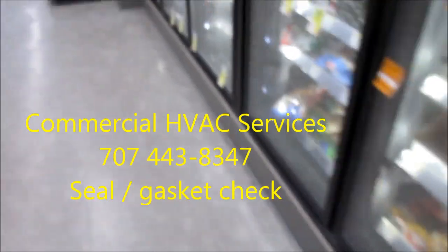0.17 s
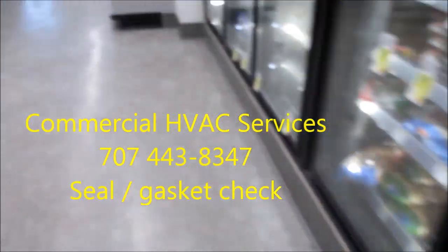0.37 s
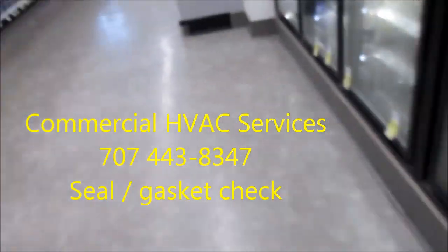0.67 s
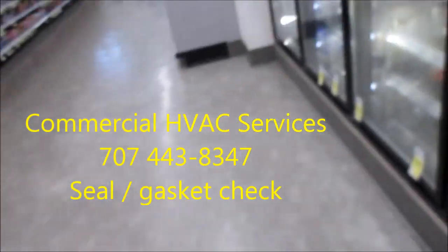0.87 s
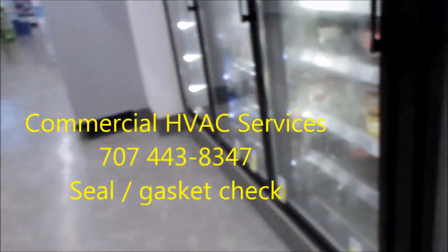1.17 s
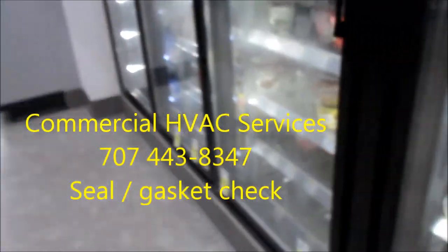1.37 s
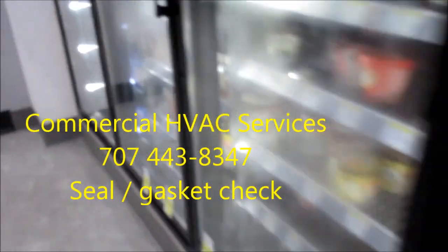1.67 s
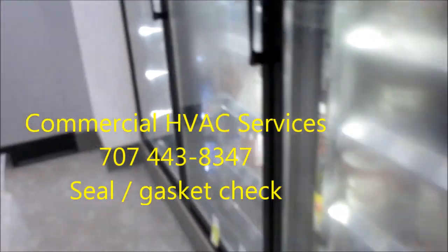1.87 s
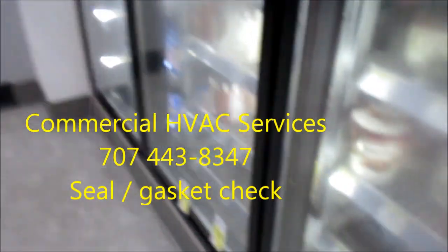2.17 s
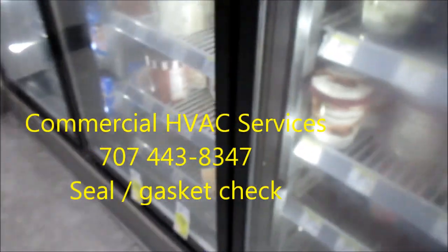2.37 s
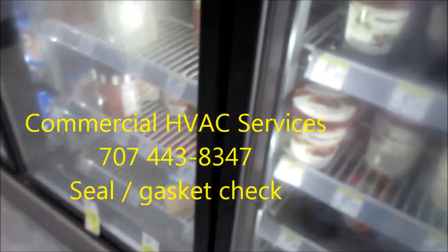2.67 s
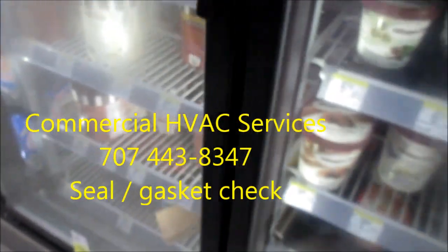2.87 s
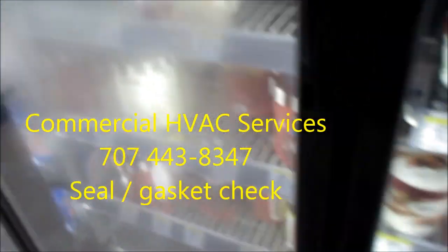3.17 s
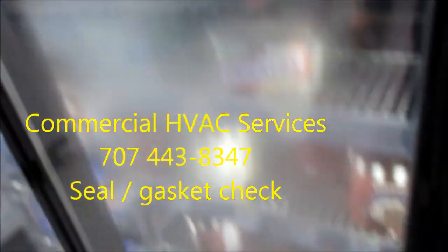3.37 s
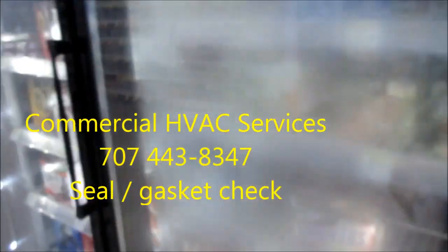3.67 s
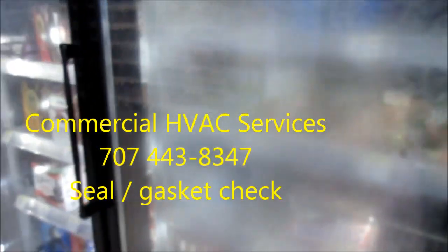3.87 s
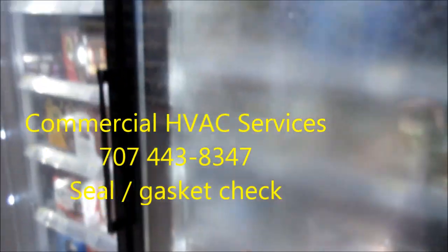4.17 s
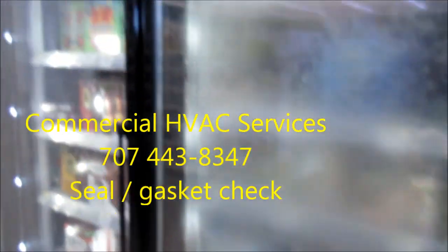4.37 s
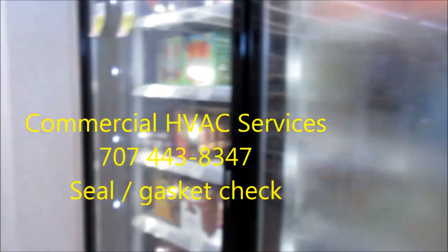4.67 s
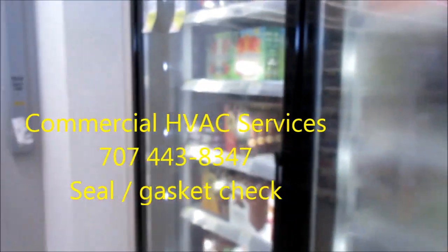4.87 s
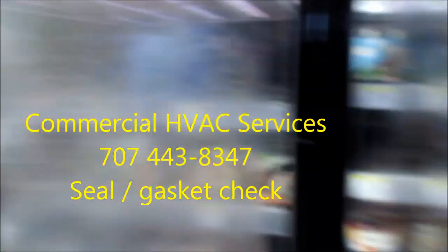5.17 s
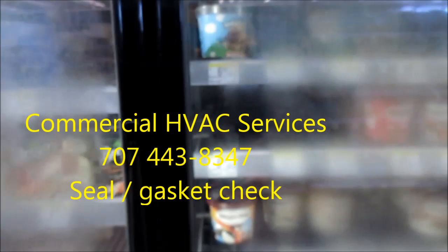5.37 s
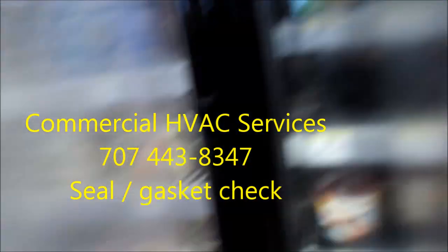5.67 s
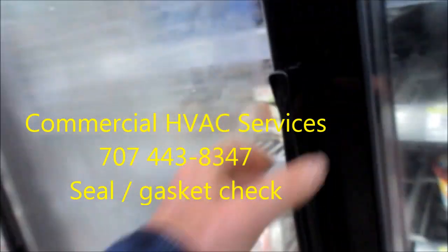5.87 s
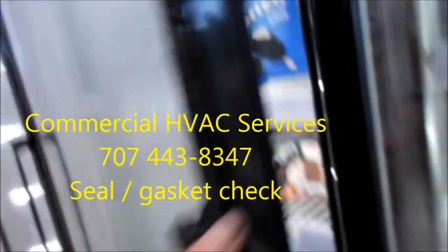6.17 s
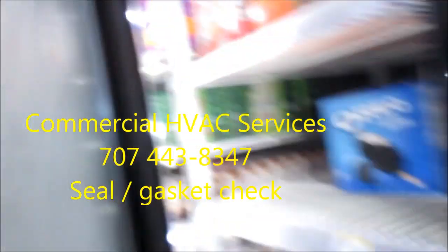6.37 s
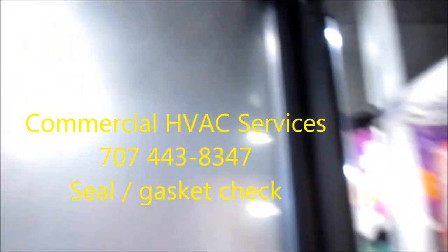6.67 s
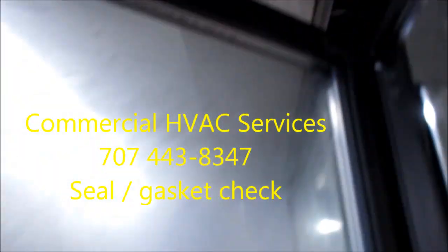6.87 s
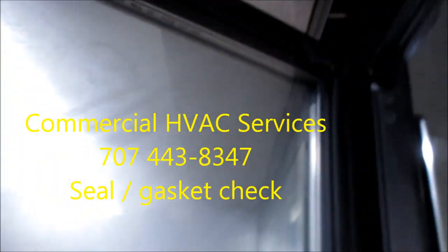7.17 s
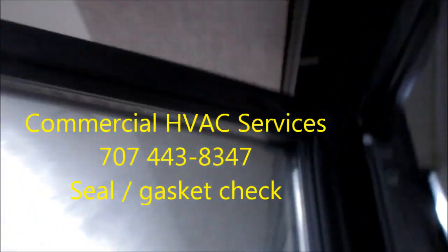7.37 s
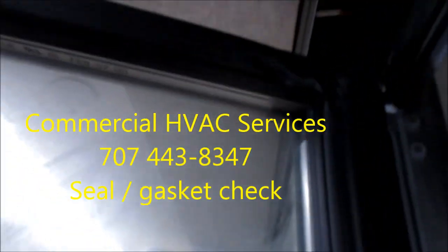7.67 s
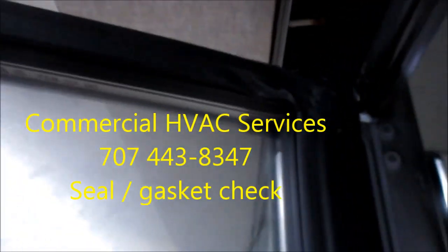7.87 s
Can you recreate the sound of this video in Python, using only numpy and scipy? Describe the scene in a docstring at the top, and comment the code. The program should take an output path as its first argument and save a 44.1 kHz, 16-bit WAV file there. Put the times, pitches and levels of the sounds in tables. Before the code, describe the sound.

Refrigerated cases drone under shoe scuffs, rustling clothes and plastic creaks, until a door unseals and louder fans throb with gusting air.

```python
"""Along the shop freezers

Compressors and fans hum behind glass doors while a walker's shoes and sleeves scuff, small hard things
tick and the plastic case of a hand-held camera creaks in the grip. Then a door peels off its gasket and
swings open: cold air rushes out and three fans of nearly equal speed throb against each other."""
import sys
import numpy as np
from scipy.fft import rfft, irfft, next_fast_len
from scipy.io import wavfile
from scipy.ndimage import map_coordinates

SR = 44100
rng = np.random.default_rng(int(sys.argv[2]) if len(sys.argv) > 2 else 0)


def generate_wav(signal):
    """Clip the signal to [-1, 1] and save it as 16-bit WAV at the path in sys.argv[1]."""
    frames = np.transpose(np.atleast_2d(signal))
    scaled = np.clip(frames, -1, 1) * 32767
    pcm = np.round(scaled).astype(np.int16)
    wavfile.write(sys.argv[1], SR, pcm)


N = 354123
TIME = np.arange(N) / SR
DOOR_AT_S, SWING_S = 5.942, 0.4


def amp(db):
    """Decibels to gain."""
    return 10 ** (np.asarray(db) / 20)


def unit(x):
    """Scale to rms 1."""
    return x / np.sqrt(np.mean(x ** 2) + 1e-20)


def ramp(start_s, length_s):
    """A smooth fade from 0 to 1."""
    return np.sin(np.pi / 2 * np.clip((TIME - start_s) / length_s, 0, 1)) ** 2


def swell(peak_s, half_width_s):
    """A smooth bump of height 1."""
    return np.exp(-((TIME - peak_s) / half_width_s) ** 2)


def stroke(t, rise_s, fall_s):
    """Exponential attack up to t = 0, then release."""
    return np.exp(np.minimum(t / rise_s, -t / fall_s))


def wobble(rate):
    """A smooth random curve, rate knots a second."""
    return map_coordinates(rng.standard_normal(int(N * rate / SR) + 4), [TIME * rate])


def filtered(x, response):
    """Pass x through a complex frequency response."""
    size = next_fast_len(len(x) + 8192)
    return irfft(rfft(x, size) * response(np.fft.rfftfreq(size, 1 / SR)), size)[:len(x)]


def colour(points, hz):
    """An EQ curve: the gain of (freq_hz, level_db) points joined on a log axis."""
    freq_hz, level_db = np.transpose(points)
    return amp(np.interp(np.log(hz + 1), np.log(freq_hz + 1), level_db))


def struck_body(points, hz):
    """The minimum-phase response of a struck body with this spectrum."""
    cepstrum = irfft(np.log(colour(points, hz)))
    half = len(cepstrum) // 2
    return np.exp(rfft(np.r_[cepstrum[0], 2 * cepstrum[1:half], np.zeros(half)]))


def resonances(modes, hz):
    """The response of (pitch_hz, width_hz, level_db) modes of alternating polarity."""
    return sum((-1) ** k * amp(db) * 1j * hz * width / (pitch ** 2 - hz ** 2 + 1j * hz * width)
               for k, (pitch, width, db) in enumerate(modes))


def noise(response, size=N):
    """Smooth filtered noise of rms 1."""
    return unit(filtered(rng.standard_normal(size), response))


def rush(spectrum):
    """Turbulent noise of rms 1, shaped by an EQ curve."""
    return noise(lambda hz: colour(spectrum, hz))


def ringing(modes):
    """Noise of rms 1 in a set of resonances."""
    return noise(lambda hz: resonances(modes, hz))


def friction(response, rate, size=N):
    """Tiny slips of random strength, rate a second, filtered and scaled to rms 1."""
    slips = rng.standard_normal(size) * (rng.random(size) < rate / SR)
    return unit(filtered(slips, response))


def motor_tones(lines, drift_hz, waver_db, rate):
    """Tones that each wander a little in speed and strength."""
    out = np.zeros(N)
    for pitch_hz, level_db in lines:
        turns = np.cumsum(pitch_hz + drift_hz * wobble(rate)) / SR + rng.random()
        out += np.sqrt(2) * amp(level_db + waver_db * wobble(rate)) * np.sin(2 * np.pi * turns)
    return out


# Fader ride on the aisle's air noise: time_s, level_db
AISLE_RIDE = [(0.24, -30.5), (1.35, -29), (1.8, -34), (2.3, -29.5), (3.1, -30), (5.95, -32.5)]
# Rumbling colour of that air: freq_hz, gain_db
AISLE_EQ = [(11, -34), (22, -19), (45, -2), (85, -8), (110, -1.5), (140, -6), (185, -9.5), (240, -8),
            (390, -10), (450, -14.5), (650, -19.5), (950, -22.5), (1560, -25), (1800, -32.5), (3000, -37),
            (4000, -43.5), (10000, -51.5), (16000, -58)]
# Cabinet panels shaken by the machines: pitch_hz, width_hz, gain_db
PANEL_MODES = [(251.4, 13.5, 1.5), (296, 9.1, 2.5), (374.4, 19.3, -5.5), (720, 74, -15.5),
               (1170, 130, -19.5), (1590, 44, -19)]
# Far compressors and fans: pitch_hz, level_db
FAR_HUM = [(26.6, -55), (29.9, -38), (58.8, -37.5), (70.7, -40), (119.9, -51), (133.2, -42.5)]
# One cabinet's blade tone and its octave: pitch_hz, gain_db
BLADE_TONES = [(126.8, -0.5), (254.5, -12.5)]
# Dips where the walk crosses nodes of that fan's standing wave: centre_s, half_width_s
FAN_NODES = [(.66, 0.16), (1.16, 0.031), (2.7, 0.35), (4.48, 0.17)]


def aisle():
    """Machines behind shut doors: air noise, droning panels and motor tones; a thin high whine sounds
    throughout."""
    near = ramp(start_s=1.5, length_s=1.78)  # the walker closes in on one cabinet
    in_node = sum(swell(centre_s, half_width_s) for centre_s, half_width_s in FAN_NODES)
    air = amp(np.interp(TIME, *np.transpose(AISLE_RIDE))) * rush(AISLE_EQ)
    panels = amp(-42 + 10 * near) * ringing(PANEL_MODES)
    hum = motor_tones(FAR_HUM, drift_hz=0.34, waver_db=2.5, rate=2.66)
    blades = motor_tones(BLADE_TONES, drift_hz=0.2, waver_db=0.8, rate=2)
    fan = amp(-33 + 2.5 * near - 11 * in_node) * blades
    whine = motor_tones([(15734, -76)], drift_hz=1, waver_db=3, rate=2)
    screened = amp(-10 * ramp(DOOR_AT_S, SWING_S))  # the open door screens off the aisle
    return screened * (air + panels + hum + fan) + whine


# Swishes of sleeves and trousers: peak_s, level_db, half_width_s
CLOTH_MOVES = [(.42, -51, 0.18), (.95, -51, 0.17), (1.8, -52, 0.17), (2.17, -53.5, .12), (2.6, -52, 0.086),
               (3.67, -52, .08), (4.55, -55, 0.18), (4.92, -50.5, 0.23), (5.22, -55, 0.089)]
# Papery colour of the fabric: freq_hz, gain_db
CLOTH_EQ = [(400, -25), (1500, 7.5), (3000, 3), (6000, -1.5), (10000, -7), (13000, -11), (16000, -19)]


def clothes():
    """Rubbing fabric swishes with every move, over a faint fluttering rustle."""
    rustle_db, flutter_db = -61, 1.5
    moves = sum(amp(db) * swell(peak_s, half_width_s) for peak_s, db, half_width_s in CLOTH_MOVES)
    return np.hypot(amp(rustle_db), moves) * amp(flutter_db * wobble(14)) * rush(CLOTH_EQ)


# Shoe and sleeve scuffs: peak_s, level_db, length_s, tilt_db_per_octave, rasp_hz
SCUFF_CUES = [(0.313, -41, 0.088, 1, 3000), (.592, -33.5, 0.068, -1.5, 6300),
              (0.728, -33.5, .032, 3.5, 2200), (0.929, -33, 0.026, -3, 6200), (1.199, -30, 0.021, -2, 1300),
              (1.317, -36, 0.028, 3, 9200), (1.862, -36.5, 0.17, -6, 4120), (1.974, -38, 0.027, 0, 6000),
              (2.031, -38, .054, 2, 5000), (2.633, -27.5, 0.039, 2, 3800), (2.687, -34.5, 0.078, 1.5, 5000),
              (2.754, -43.5, 0.073, 5, 5300), (3.043, -29.5, .022, 4.5, 1520), (3.302, -44, 0.023, 3, 6000),
              (3.405, -39.5, 0.071, 1.5, 5000), (5.138, -43, 0.077, -2, 3500),
              (5.596, -46, 0.16, 1.5, 5500), (5.78, -45, .07, -2, 6000)]
# Mid-heavy colour shared by scuffs, ticks and the gasket: freq_hz, gain_db
CONTACT_EQ = [(150, -29), (500, 11.5), (1200, 9), (2500, 2), (4500, -3), (7000, -6), (10000, -8),
              (13000, -12), (16000, -19)]


def scuffs():
    """Shoes and sleeves rub: each burst of slips swells and dies with its own tilt and raspy peak."""
    out = np.zeros(N)
    t = np.arange(SR // 2) / SR - 0.25  # zero at the peak
    rise_share = 0.35
    for peak_s, level_db, length_s, tilt_db, rasp_hz in SCUFF_CUES:
        rasp = lambda hz: 1 + resonances([(rasp_hz, 0.37 * rasp_hz, 3)], hz)
        body = lambda hz: colour(CONTACT_EQ, hz) * amp(tilt_db * np.log2(1 + hz / 1500)) * rasp(hz)
        rub = friction(body, rate=9000, size=len(t))
        envelope = stroke(t, rise_share * length_s, (1 - rise_share) * length_s)
        out[round((peak_s + t[0]) * SR):][:len(t)] += amp(level_db) * envelope * rub
    return out


# Small hard contacts: start_s, crack_db, ring_hz, ring_over_crack_db
TICK_CUES = [(.85, -33, 3900, -0.5), (1.163, -30.5, 1880, 0), (1.295, -26, 2500, -16),
             (1.34, -37, 1090, 11), (1.505, -45, 1170, 15.5), (1.713, -40.5, 1400, 3),
             (2.1965, -41.5, 720, 18.5), (2.266, -36.5, 720, 11), (2.525, -37, 6960, -1),
             (2.612, -45, 1190, 15), (2.672, -32, 1170, 14), (3.044, -41, 1400, 4),
             (3.265, -31.5, 1970, 4.5), (4.768, -43, 1090, 15), (5.59, -41, 1490, 17)]


def ticks():
    """Each hard contact gives a crack, a knock of a few cycles and one short, blurred ring."""
    out, t = np.zeros(N), np.arange(SR // 10) / SR
    knock_cycles, blur_db = 2.6, -5.5
    for start_s, crack_db, ring_hz, ring_db in TICK_CUES:
        t60_s = 0.04 * (1500 / ring_hz) ** 0.55  # higher rings die sooner
        crack = noise(lambda hz: colour(CONTACT_EQ, hz), len(t))
        blur = noise(lambda hz: resonances([(ring_hz, 0.5 * ring_hz, 0)], hz) ** 2, len(t))
        knock = 2 * np.sin(2 * np.pi * ring_hz * t) * np.exp(-ring_hz * t / knock_cycles)
        ring = amp(ring_db) * (knock + amp(blur_db) * blur)
        out[round(start_s * SR):][:len(t)] += amp(crack_db - 60 * t / t60_s) * (crack + ring)
    return out


# The camera case slips in the grip: start_s, snap_db, chatter_db, chatter_length_s
CREAK_CUES = [(1.331, -28, -25, 0.014), (1.403, 0.5, -22, 0.021), (1.473, -12, -27, 0.018),
              (1.5292, -13.5, -29.5, 0.016), (1.645, -30, -28.5, 0.029), (2.013, -16.5, -32.5, 0.014),
              (5.607, -15.5, -33.5, 0.043)]
# Hollow body of the plastic shell: freq_hz, gain_db
SHELL_EQ = [(100, -25), (300, 0.5), (600, 4), (950, -8), (1350, -2), (1900, -8.5), (2550, -5), (3050, -19),
            (3600, -21.5), (5000, -25.5), (6200, -23.5), (7400, -30.5), (9000, -29), (12800, -34),
            (16000, -43)]
# The shell's ring after a snap: pitch_hz, width_hz, gain_db
SHELL_MODES = [(1400, 380, 3), (2360, 230, -3)]


def grip_creaks():
    """The plastic lets go with a ringing snap, then chatters in brighter slips until it sticks again."""
    out, t = np.zeros(N), np.arange(SR // 10) / SR
    dull_hz, bright_hz, ring_db = 4500, 3000, -17
    treble_lift = lambda hz: 1 + 1j * hz / bright_hz
    impulse = 1.0 * (t == 0)
    thud = filtered(impulse, lambda hz: struck_body(SHELL_EQ, hz) / (1 + 1j * hz / dull_hz))
    ring = filtered(impulse, lambda hz: resonances(SHELL_MODES, hz) / treble_lift(hz))
    snap = thud / np.abs(thud).max() - amp(ring_db) * ring / np.abs(ring).max()
    for start_s, snap_db, chatter_db, length_s in CREAK_CUES:
        chatter = friction(lambda hz: struck_body(SHELL_EQ, hz) * treble_lift(hz), rate=9000, size=len(t))
        sliding = amp(-3 * t / length_s) * np.exp(-(t / length_s) ** 6)  # sags, then stops short
        out[round(start_s * SR):][:len(t)] += amp(snap_db) * snap + amp(chatter_db) * sliding * chatter
    return out


# The rubber gasket lets go in two pulls: peak_s, level_db
GASKET_PULLS = [(6.05, -27.5), (6.118, -38)]
# Low pushes of air from the moving door: centre_s, level_db
DOOR_PUFFS = [(6.133, -13), (7.915, -24)]


def door_seal():
    """The gasket crackles off the frame; the pressure evens out in low puffs."""
    pull = sum(amp(db) * stroke(TIME - peak_s, rise_s=0.0086, fall_s=0.027) for peak_s, db in GASKET_PULLS)
    out = pull * friction(lambda hz: colour(CONTACT_EQ, hz), rate=3000)
    puff_hz = 45
    for centre_s, level_db in DOOR_PUFFS:
        pressure = np.sin(2 * np.pi * puff_hz * (TIME - centre_s))
        out -= amp(level_db) * pressure * swell(centre_s, half_width_s=0.013)
    return out


# Three beating fan tones and one overtone: pitch_hz, gain_db
FREEZER_FANS = [(120.0, -1.5), (126.7, -8), (133.4, -.5), (400.2, -21)]
# Cold air spills out in gusts: peak_s, draught_db, air_lift_db
COLD_GUSTS = [(6.36, -16, -1.5), (6.68, -23, 3.5), (7.1, -36, 1.5), (7.63, -22, 0)]
# Colour of the fans' air noise: freq_hz, gain_db
FAN_AIR_EQ = [(25, -20), (70, -12.5), (105, 1), (150, 0.5), (190, -3.5), (240, 0), (500, -9.5),
              (700, -10.5), (900, -12.5), (1200, -16.5), (2500, -23), (4000, -31.5), (8000, -40.5),
              (12000, -44.5), (16000, -50)]
# Air modes of the open freezer: pitch_hz, width_hz, gain_db
CAVITY_MODES = [(149.4, 9.6, 0), (252.3, 18.5, -12.5), (283, 5.2, -8.5), (327, 20, -7.5), (388.3, 4, -11),
                (494, 27, -10)]
# Dull buffet of the draught on the microphone: freq_hz, gain_db
DRAUGHT_EQ = [(20, -32), (70, -5), (130, -2.5), (280, 3.5), (500, -5.5), (750, -13.5), (1200, -26),
              (2500, -30), (8000, -40), (16000, -57)]


def open_freezer():
    """The open door lets out the fans' throb and air noise, a hollow drone, grille hiss and cold gusts."""
    gust_half_width_s, throb_lag_s = 0.13, 0.059  # the fans lie deep inside: their throb follows the air
    flow_db = sum(lift_db * swell(peak_s, gust_half_width_s) for peak_s, _, lift_db in COLD_GUSTS)
    gusts = sum(amp(db) * swell(peak_s, gust_half_width_s) for peak_s, db, _ in COLD_GUSTS)
    fans = motor_tones(FREEZER_FANS, drift_hz=0.4, waver_db=1.3, rate=6)
    throb = amp(-18.5) * ramp(DOOR_AT_S + throb_lag_s, SWING_S) * fans
    eddies = wobble(16)
    air = amp(-21.5 + flow_db + 0.5 * eddies) * rush(FAN_AIR_EQ)
    cavity = amp(-28.5) * ringing(CAVITY_MODES)
    grille = amp(-55) * ringing([(10400, 460, 0)])
    draught = np.hypot(amp(-30), gusts) * amp(eddies) * rush(DRAUGHT_EQ)  # gusts over a steady flow
    return throb + ramp(DOOR_AT_S, SWING_S) * (air + cavity + grille + draught)


def scene():
    """The machine beds and the walker's close sounds, mixed in mono."""
    machines = aisle() + open_freezer()
    return (machines + door_seal() + clothes() + scuffs() + ticks() + grip_creaks())[None]


# The microphone's colour, with one narrow treble notch: freq_hz, gain_db
MIC_EQ = [(20, 1.5), (7600, 0.5), (7880, -7.5), (8150, 1), (16000, -4)]


def record(dry):
    """The microphone opens after a moment of silence, colours the sound and cuts the very top."""
    start_s, top_hz = 0.239, 15900
    heard = dry[0] * (TIME > start_s)
    return filtered(heard, lambda hz: colour(MIC_EQ, hz) * (hz < top_hz))[None]


dry = scene()
out = record(dry)
generate_wav(out)
```